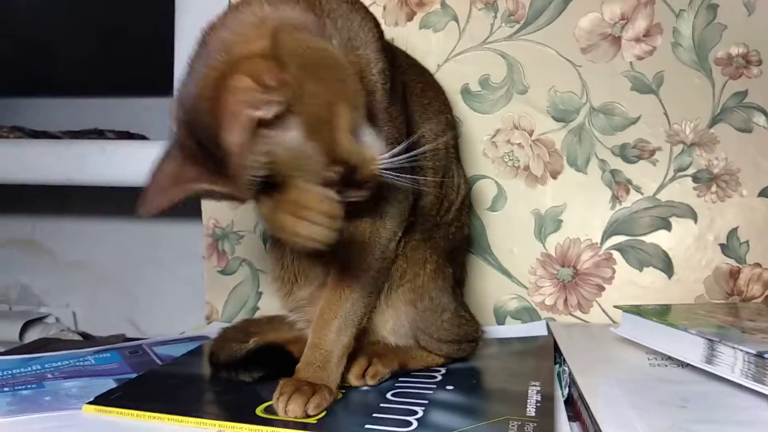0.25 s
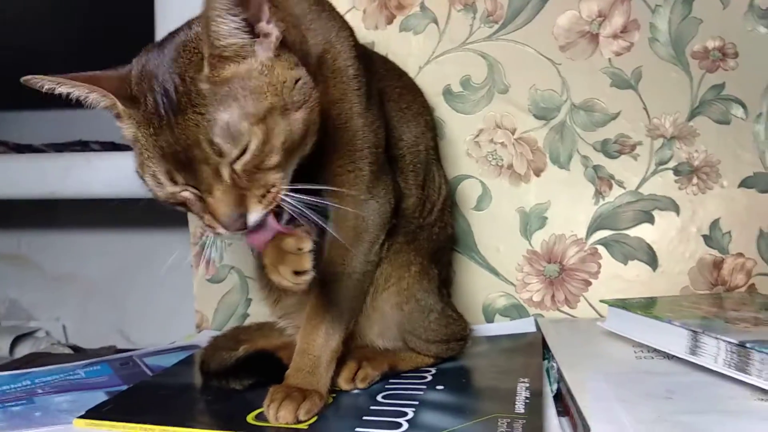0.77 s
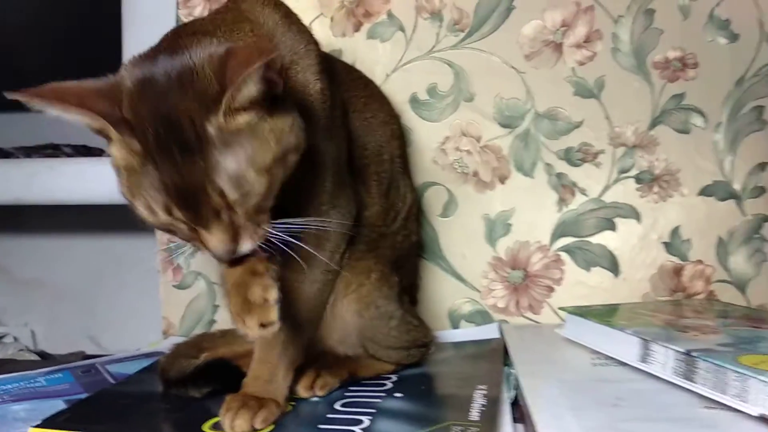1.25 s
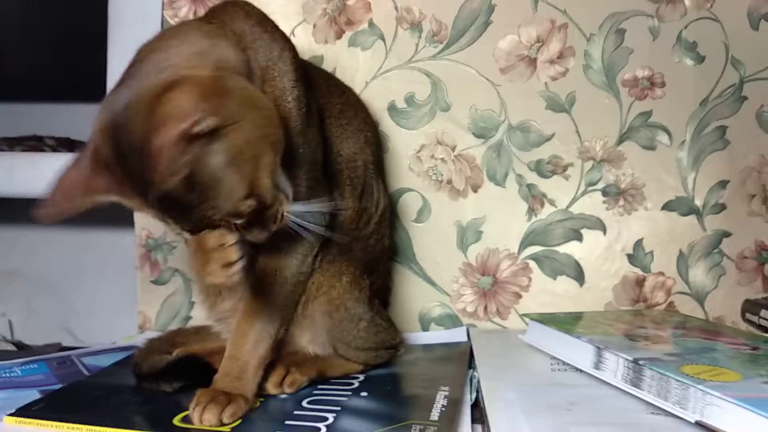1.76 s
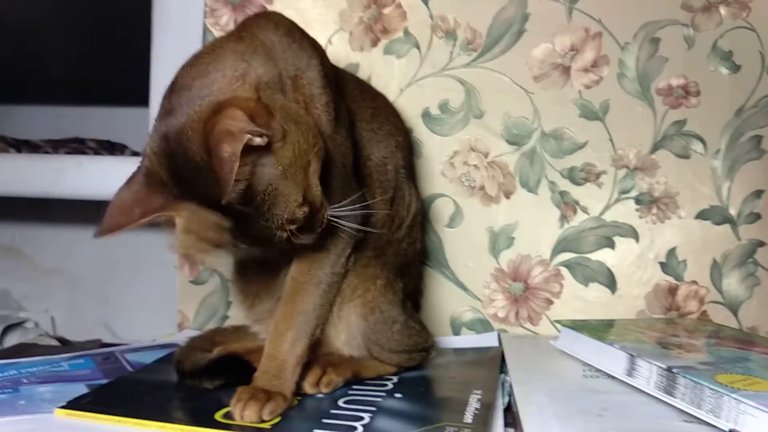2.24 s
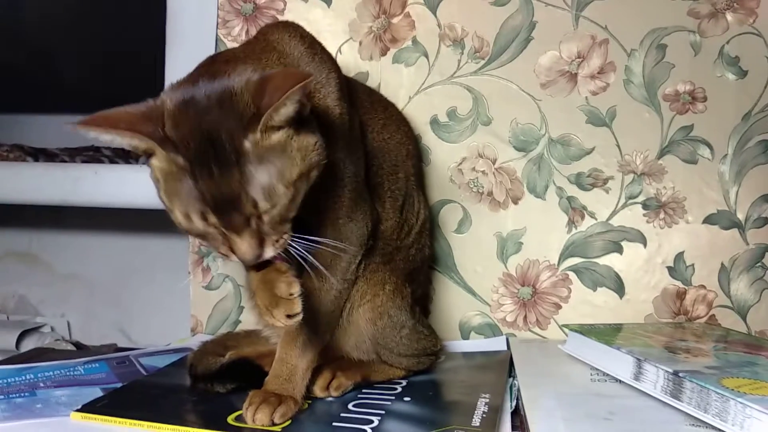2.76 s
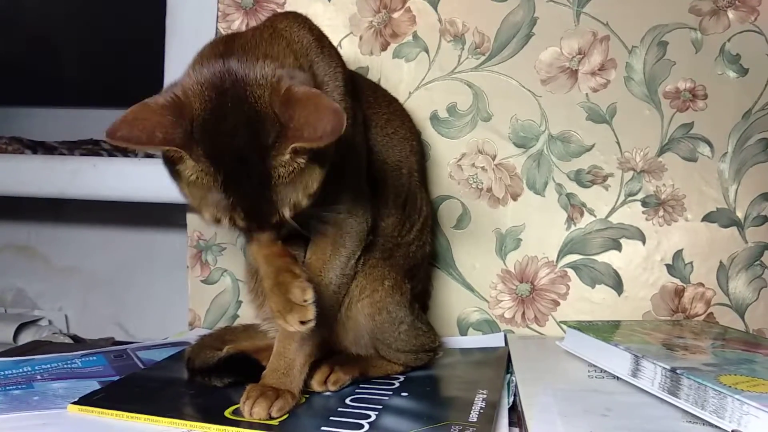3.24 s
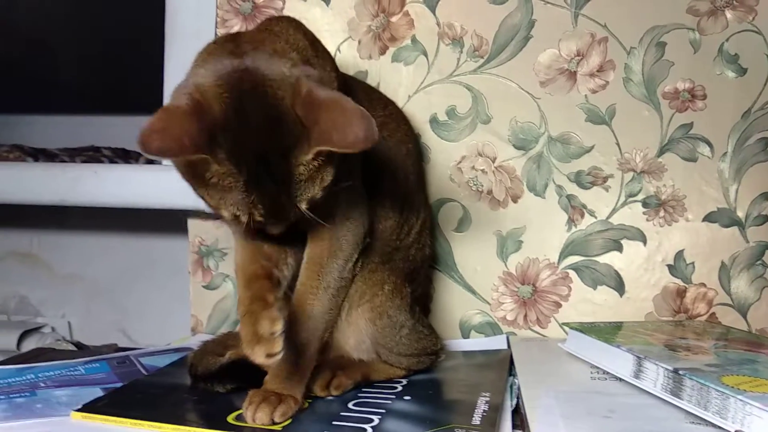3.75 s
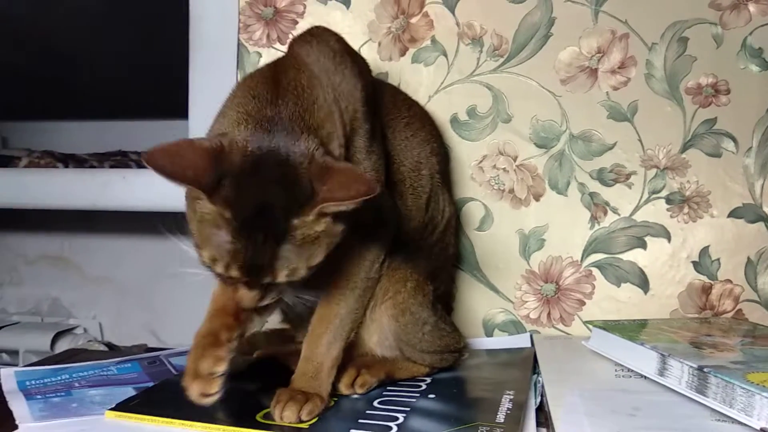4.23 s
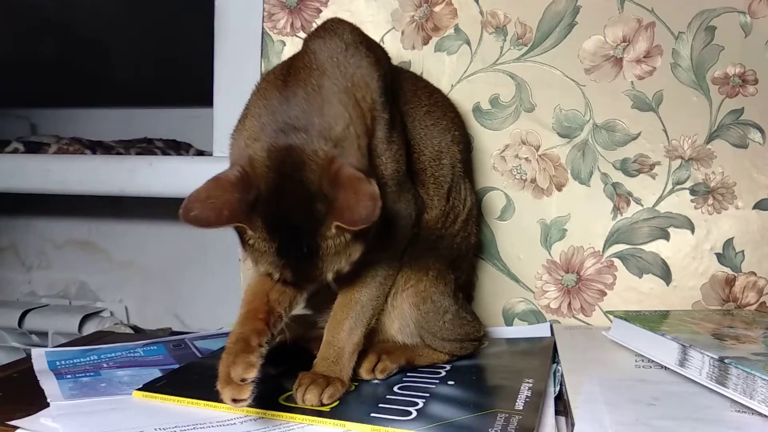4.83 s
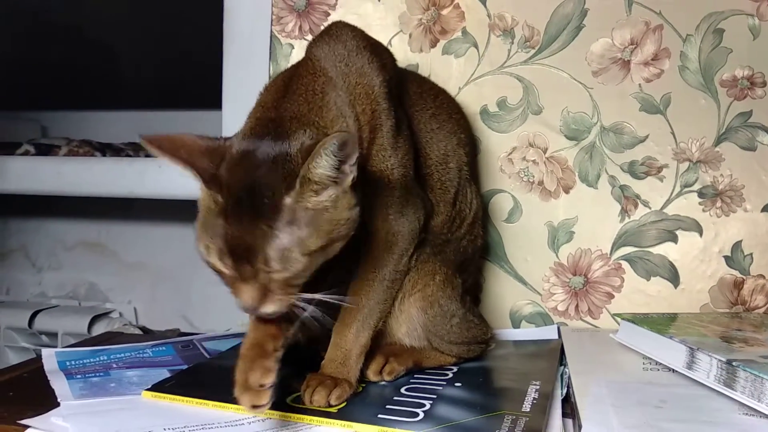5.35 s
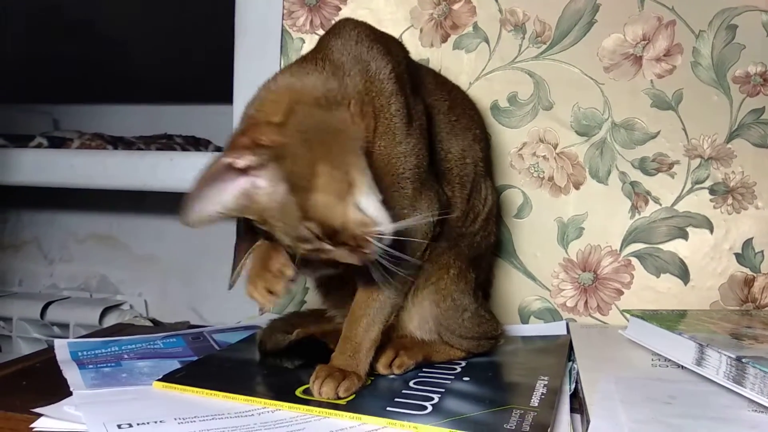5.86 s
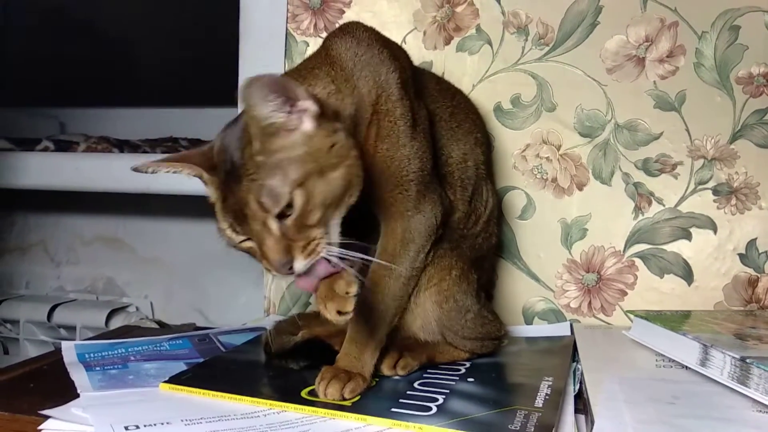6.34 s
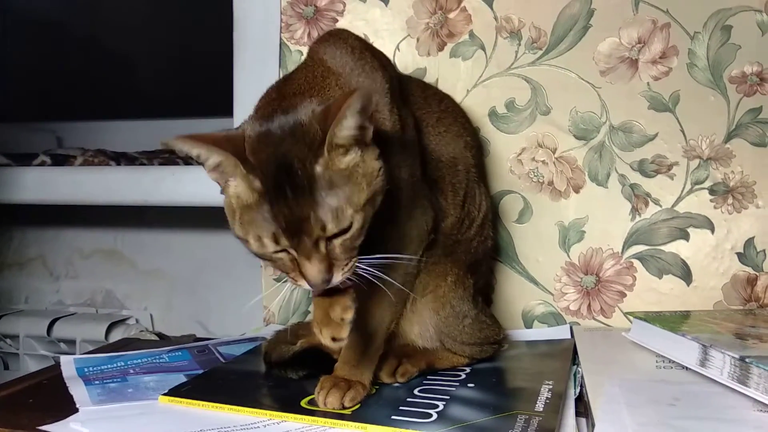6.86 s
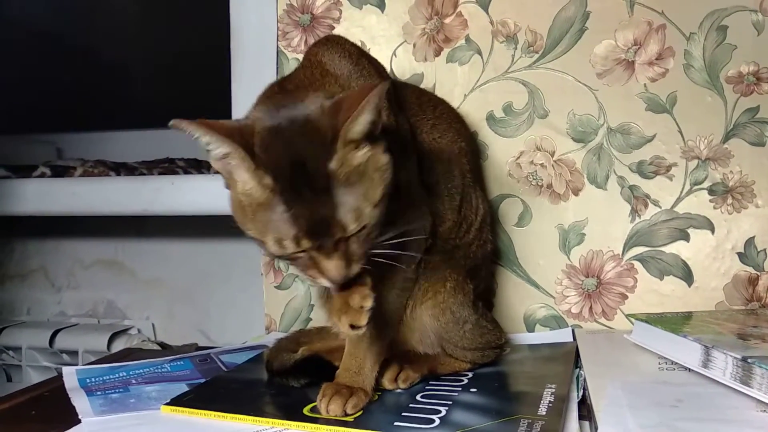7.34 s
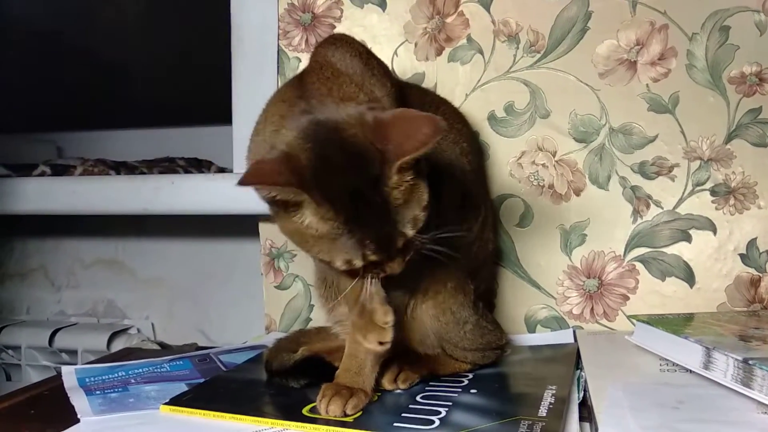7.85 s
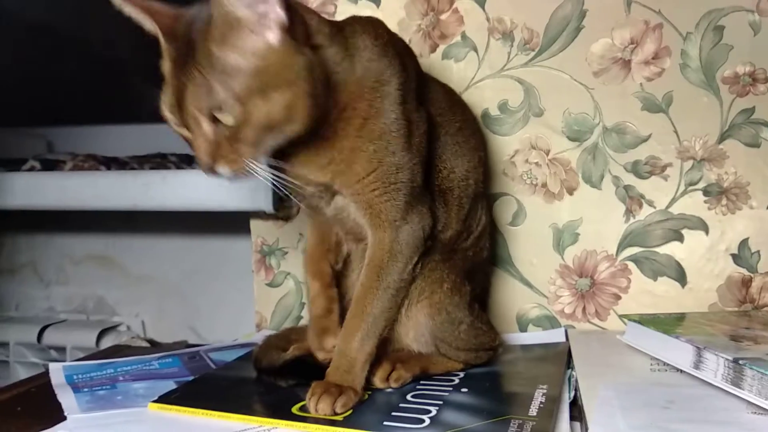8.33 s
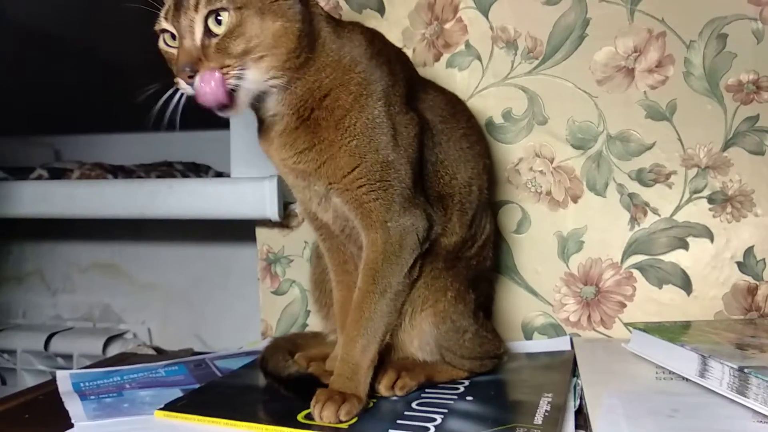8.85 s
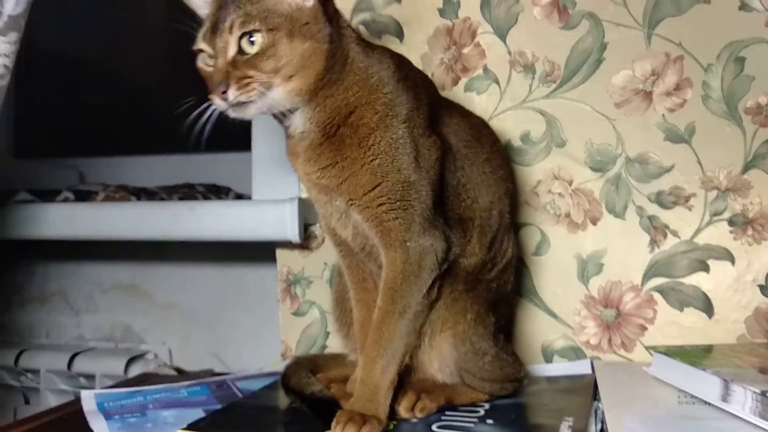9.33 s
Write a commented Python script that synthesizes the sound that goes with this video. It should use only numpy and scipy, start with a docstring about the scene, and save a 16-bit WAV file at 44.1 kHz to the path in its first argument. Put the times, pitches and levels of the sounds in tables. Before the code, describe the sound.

A cat grooms itself in a quiet room: faint raspy licks, small snuffles and wet ticks, with sharp plastic clicks close at the left microphone.

```python
"""A cat washes its paw and face in a quiet room, close to a hand-held camera: tongue and paw rasp as grainy noise.
It snuffles into its coat in chopped puffs of air, its wet tongue and lips tick, its paws bump on magazines.
Hard by the left microphone the case clicks as a double snap with ringing modes, is knocked, and is brushed
in bands of hiss. Behind lies the low drone of the house, as filtered noise whose level wavers.
The soft sounds of fur, snuffles and drone drop out briefly now and then."""
import sys
import numpy as np
from scipy import signal
from scipy.fft import rfft, irfft, next_fast_len
from scipy.io import wavfile
from scipy.ndimage import uniform_filter1d, map_coordinates

SR = 44100
rng = np.random.default_rng(int(sys.argv[2]) if len(sys.argv) > 2 else 0)


def digitize_waveform(pressure):
    """Quantize a signal to 16-bit integers and store it at the path in sys.argv[1].

    Rows of a 2-D input are taken as channels; values are limited to [-1, 1].
    """
    field = np.atleast_2d(pressure).T
    bounded = np.clip(field, -1, 1)
    quanta = np.round(bounded * 32767).astype(np.int16)
    wavfile.write(sys.argv[1], SR, quanta)


N = 422919

# strokes of tongue or paw over the fur: start t/s, length t/s, hiss level/dB before trim,
# dull rub level/dB relative to the hiss, before trim
STROKES = [(-.04, 0.085, -51.5, -7), (0.106, 0.44, -48, -4.5), (0.329, 0.15, -40.5, -2.5),
           (0.475, 0.13, -44.5, 0), (0.562, 0.17, -51.5, 0), (0.827, 0.14, -41, -6.5),
           (1.13, 0.15, -50, -3), (1.318, 0.067, -46.5, -6.5), (1.36, 0.52, -48.5, -7),
           (1.599, 0.099, -45, -4.5), (1.696, 0.11, -45, -12), (1.852, 0.073, -47, -9.5),
           (1.99, 0.14, -46, -7), (2.167, 0.085, -55, 3.5), (2.37, 0.21, -44, -21), (2.562, 0.26, -44, -9),
           (2.881, 0.12, -48, -7.5), (3.12, 0.25, -49.5, -1), (3.436, 0.13, -55, -3),
           (3.554, 0.14, -49, -4.5), (3.67, 0.18, -53, -6.5), (3.835, 0.069, -53, -1),
           (4.01, 0.49, -51.5, -27), (4.54, 0.11, -52, 0.5), (4.655, 0.14, -59.5, 1.5),
           (4.836, 0.3, -55, -1.5), (4.972, 0.067, -52.5, 1), (5.202, 0.11, -64, 11),
           (5.292, 0.22, -58.5, 3.5), (5.487, 0.066, -66.5, 21.5), (5.573, 0.062, -48.5, 0.5),
           (5.885, 0.083, -57, -3), (5.958, 0.092, -56, -9), (6.096, 0.12, -62, -6),
           (6.636, 0.078, -53.5, -10), (6.914, 0.089, -46, -10), (7.084, .07, -51, -26),
           (7.398, 0.16, -50.5, -24), (7.625, 0.19, -56.5, 2.5), (7.804, 0.21, -48, -8),
           (7.98, 0.28, -46.5, -10), (8.207, 0.12, -50.5, -5), (8.505, 0.25, -45, -7.5),
           (8.922, 0.53, -45, -2), (9.126, 0.52, -45, -2)]
# continuous rustle of the moving coat, rising and falling: t/s, hiss level/dB before trim
COAT_RUSTLE = [(0, -56.5), (.77, -62.5), (1, -48), (1.5, -51.5), (2.7, -48), (3.08, -57.5), (3.3, -54),
               (3.95, -62), (4.7, -60), (5.2, -62.5), (5.65, -58), (6.3, -70.5), (6.8, -59), (7, -50.5),
               (7.33, -54), (7.7, -47.5), (8.45, -49.5), (9.59, -48.5)]
# colour of the hairs' hiss: f/Hz, relative level/dB
HAIR_COLOUR = [(880, -20), (1500, -8), (2910, -5.5), (3060, -4), (4690, -1.5), (5070, -1), (8740, 1.5),
               (10800, -1), (15100, -11), (16000, -8.5)]
# colour of the dull rub on the skin: f/Hz, relative level/dB
RUB_COLOUR = [(150, -3.5), (260, -4), (400, 0), (600, -0.5), (950, 0.5), (1150, -2), (1600, 2), (2300, -4),
              (4000, -15)]
COAT_RUB_DB = -7  # rub of the rustling coat, relative to its hiss, before trim
HAIRS_DB, RUB_DB = 0.1, -2  # trims of the two layers
PEAK_SHARE, ROUNDNESS = 0.43, 0.47  # how far into a stroke it presses hardest; under 1 = a flat top
SLIPS_PER_S, SLIP_SHARE = 900, 0.11  # hairs that snap free of the barbs; their weight beside the noise
TUFTS_PER_S, TUFT_SHARE = 300, 0.43  # tufts that flick back and roughen the rub; their weight

# the cat's snuffles: t/s, level/dB, rise t/s, hold t/s, t60/s, centre f/Hz, width/octaves,
# hiss skirt level/dB before trim
SNUFFLES = [(0.516, -44, 0.011, 0.012, .12, 885, 0.14, -17), (0.892, -42, 0.013, 0.01, 0.15, 654, 1, -8),
            (1.593, -39.5, 0.0089, 0.015, 0.11, 596, 0.4, -28),
            (1.638, -49.5, .01, 0.016, 0.075, 1920, 0.44, -18),
            (1.737, -40, 0.0055, 0.017, 0.18, 830, 0.58, -27),
            (1.83, -48.5, .006, .01, 0.15, 1830, 0.46, -21),
            (2.685, -45, 0.012, 0.014, 0.35, 470, 0.1, -13),
            (3.253, -41.5, 0.003, 0.033, 0.24, 960, 0.45, -30),
            (3.27, -43, 0.0074, 0.01, .04, 930, 0.14, -28),
            (4.819, -39, 0.0072, 0.0083, 0.12, 1050, 0.51, -20.5),
            (4.857, -50.5, .008, 0.0094, 0.074, 900, .45, -21),
            (5.327, -46.5, 0.021, .012, 0.11, 780, 0.43, -22),
            (5.491, -32, 0.0082, 0.008, 0.18, 1065, 0.28, -26),
            (5.584, -46, 0.0029, 0.0066, 0.2, 1430, 0.41, -17),
            (6.387, -34.5, 0.012, 0.017, 0.17, 1190, 0.27, -18),
            (6.3967, -34, 0.00073, .003, 0.18, 2530, 0.17, -21),
            (6.443, -47, 0.013, 0.046, 0.18, 1380, .3, -2),
            (6.881, -59, .006, 0.0098, 0.055, 1600, 0.23, -24),
            (7.079, -57.5, 0.017, 0.046, .15, 2060, .17, -23)]
# colour of the nose: f/Hz, relative level/dB
NOSE_COLOUR = [(100, -14), (350, 4.5), (560, 2.5), (950, -5), (1500, 5.5), (2300, 1.5), (2900, 0.5),
               (3600, 3.5), (9000, -1.5), (16000, -15)]
SNUFFLE_SKIRT_DB = -1.5  # trim of the hiss in all snuffles
# the moist nostril flaps: middle rate, share of the air that they chop, unevenness
RASP_PER_S, RASP_SHARE, RASP_JITTER = 200, 0.45, 0.4
# resonances of the corner between wall, shelf and table: f/Hz, width/Hz, level/dB before scaling
CORNER = [(157, 12, 7.5), (176, 14, 6.5), (414.5, 27, 5), (577, 52, 6), (762, 22, 7), (968, 41, 8.5),
          (1150, 30, 6), (1314, 17, 8), (1435, 17, 3), (1577, 54, 3), (1936, 36, 4)]

# wet ticks of the tongue and lips, and at 6.3973 s the sharp onset of a snuffle:
# t/s, level/dB before trim, t60/s, pitch f/Hz, hiss level/dB beside the pitch
TICKS_AND_ONSET = [(0.345, -27.5, 0.054, 6460, -6), (.407, -32, .012, 6500, -3),
                   (0.612, -36.5, 0.16, 4200, -1), (0.684, -45, 0.14, 5200, 12),
                   (1.3223, -35.5, 0.049, 5200, 11), (2.032, -36, .012, 4240, -10),
                   (2.054, -35, 0.011, 4200, -8), (2.076, -34, 0.01, 4200, -14),
                   (2.253, -42, 0.0051, 5200, -6), (5.499, -44, 0.043, 3520, -14),
                   (5.588, -36.5, 0.06, 4800, -6), (5.779, -49, 0.11, 5200, 5), (5.908, -46, .03, 5200, -5),
                   (6.114, -51, 0.018, 4000, -18), (6.29, -51.5, .02, 5200, -12),
                   (6.347, -61, 0.018, 5200, -1), (6.3973, -23, 0.041, 1380, -38),
                   (6.491, -37.5, 0.028, 1490, -18), (6.747, -46, .02, 5200, 4),
                   (9.0428, -30, .012, 4930, -26)]
# colour of the wet mouth, shared by the onset: f/Hz, relative level/dB
WET_COLOUR = [(200, 2), (600, 2.5), (2000, -2), (4500, -1.5), (9000, 3.5), (16000, -7)]
# soft bumps of the paws on the magazines, and at 1.9888 s the short dull body of a case click:
# t/s, level/dB before trim, f/Hz, t60/s
BUMPS_AND_CLICK_BODY = [(0.159, -54.5, 80, 0.16), (1.35, -54, 86.5, 0.43), (1.451, -47.5, 221, 0.093),
                        (1.622, -44.5, 217, 0.17), (1.729, -51.5, 198, 0.23), (1.77, -50.5, 90, 0.26),
                        (1.9888, -31, 640, 0.0065), (2.819, -57, 95, 0.45), (5.502, -46, 91, 0.18),
                        (7.521, -49.5, 218, 0.074), (8.059, -51, 240, 0.12), (8.251, -50.5, 99, 0.18),
                        (9.281, -53, 219, 0.39), (9.368, -48.5, 197, 0.11)]

# wipes of a finger on the case (much weaker at the right) or of the paw on the cheek:
# t/s, length t/s, left level/dB, centre f/Hz, width/octaves, right minus left level/dB
BRUSHES = [(2.019, 0.077, -38.5, 4500, 0.62, -13), (2.069, 0.13, -41.5, 4600, 0.69, -18),
           (2.155, 0.12, -35.5, 4560, 0.54, -30), (2.255, 0.071, -43, 4620, 0.52, -24),
           (.86, 0.12, -49.5, 2916, 0.51, 1.5), (5.58, 0.08, -55, 4900, 0.27, -5)]
FLICKS_PER_S, FLICK_SIZE = 900, 3  # tiny catches in a wipe; their size over its hiss

# clicks of the case: t/s, overall level/dB, ringing level/dB before trim, brightness/dB per octave,
# gap to the second snap t/s, share of the case's colour (0-1), scrape level/dB within the snap
CLICKS = [(1.9882, -15.5, -13, -0.5, 0.00076, 0.43, -6.5), (2.7958, -11.5, -3.5, -1, .00105, 0.9, -11),
          (4.2684, -12, -4.5, -.5, .00105, 1, -13), (4.312, -17, -7, 4.5, .00082, 0.82, -11),
          (4.318, -25, 3, 2, .0009, 0.6, -14), (4.332, -32.5, 7.5, -6, .0009, .7, -15),
          (6.9344, -7.5, -4, -1.5, .00105, 1, -16), (6.949, -14, -3, 3, .00108, 0.64, -10),
          (6.9594, -19, -1, 3, .0008, 1, -13.5), (9.092, -8.5, -3.5, -1, 0.000853, 0.94, -13.5),
          (9.281, -18, 0, -2.5, .00105, 1, -13), (9.2885, -24, -8, 7, 0.00071, 1, -8),
          (9.296, -15.5, -3, 5, .001, 1, -10.5)]
# colour of the case: f/Hz, relative level/dB
CASE_COLOUR = [(100, -47), (210, -24), (300, -4), (480, -21), (800, -20), (1040, -7.5), (1500, -17),
               (2150, -21.5), (2900, 3.5), (3300, -4), (3850, 2.5), (4700, -2.5), (6000, -9), (7300, 3.5),
               (8500, -7), (9700, -12), (11500, -13.5), (13500, -19.5), (16000, -33)]
# colour of the clicks at the right microphone: f/Hz, relative level/dB
FAR_COLOUR = [(100, -15), (320, -5), (520, -15), (900, -4), (1500, -2), (2500, -13), (3700, -2), (5500, -7),
              (7500, -3.5), (12000, -2.5), (16000, -15)]
# ringing modes of the case: f/Hz, relative level/dB, t60/s
CASE_MODES = [(304, -22.5, 0.14), (401, -33, 0.13), (1049, -23, 0.1), (1396, -26.5, 0.1),
              (1890, -24, 0.071), (2980, -16.5, 0.056), (3120, -31, .03), (4840, -27, 0.032),
              (7060, -20, 0.037), (7420, -21, 0.032), (8600, -30, 0.02)]
SECOND_SNAP_DB = -2.5  # second snap's impulse; the first is 0.9 in amplitude
SCRAPE_S = 0.0025  # the plastic scrapes this long as it lets go
AFTER_SLIPS_PER_S, AFTER_SLIP_SIZE = 990, 2.7  # slips that crackle in a click's tail; gain each adds
RING_WANDER_HZ = 22  # rms pitch waver of the held shell's modes
# dull knocks on the case: t/s, left level/dB, f/Hz, t60/s
KNOCKS = [(1.9895, -26, 292, 0.031), (2.0338, -30.5, 292, 0.013), (4.3125, -43, 304, .05),
          (4.333, -41.5, 397, 0.061), (6.9359, -41, 320, 0.038)]
KNOCK_RIGHT_DB = -15  # right microphone, relative to the left

# level of the house's low drone: t/s, mean level/dB
DRONE_LEVEL = [(0, -63), (5.4, -62.5), (5.9, -65), (6.9, -61), (7.3, -63.5), (9.59, -64)]
# colour of the drone: f/Hz, relative level/dB
DRONE_COLOUR = [(20, -48), (38, -30), (55, -19), (78, 1.5), (100, -4.5), (130, -3.5), (180, 0), (230, -4),
                (310, -15), (600, -21), (2000, -26.5), (16000, -30.5)]
# spans in which the soft sounds drop out: from t/s, to t/s
DROPS = [(.781, .795), (.813, .829), (3.968, 4), (4.788, 4.803), (5.123, 5.144), (5.194, 5.212),
         (5.304, 5.318), (5.864, 5.891), (6.066, 6.113), (6.143, 6.161), (6.237, 6.289), (6.298, 6.347),
         (6.358, 6.389), (6.574, 6.612)]
DROP_DB_PER_S, DROP_DEEPEST_DB = -1150, -30  # a longer gap is a deeper one, down to the limit
# likeness of the two microphones: f/Hz, left-right correlation
ALIKE = [(60, 0.61), (300, 0.74), (600, 0.64), (900, 0.18), (1200, -0.13), (3000, 0.091), (8000, -0.075),
         (16000, -0.05)]
TOP_HZ = 16000  # band limit of the camera


def fur():
    """Hairs slip off the tongue's barbs as dense grains over a duller rub of the skin, all on the coat's rustle."""
    hiss_power = amp(np.interp(np.arange(N) / SR, *np.transpose(COAT_RUSTLE))) ** 2
    rub_power = hiss_power * amp(COAT_RUB_DB) ** 2
    for start, length, db, rub_db in STROKES:
        power = (amp(db) * pressure(start, length)) ** 2
        hiss_power = hiss_power + power
        rub_power = rub_power + power * amp(rub_db) ** 2

    hair_noise = unit(patchy(patchy_db=2, size=1024)) + SLIP_SHARE * grains(N, SLIPS_PER_S)
    hairs = stereo(hair_noise, lambda hz: along(HAIR_COLOUR, hz))
    rub_noise = unit(patchy(patchy_db=3, size=1024)) + TUFT_SHARE * grains(N, TUFTS_PER_S)
    rub = stereo(rub_noise, lambda hz: along(RUB_COLOUR, hz) + corner(hz))

    # each layer's level also flutters at random
    hairs_gain = amp(HAIRS_DB + 0.83 * wobble(70))
    rub_gain = amp(RUB_DB + 1.2 * wobble(50))
    return hairs * np.sqrt(hiss_power) * hairs_gain + rub * np.sqrt(rub_power) * rub_gain


def pressure(start, length):
    """A stroke presses in, peaks and lifts off."""
    peak = start + length * PEAK_SHARE
    phase = np.interp(np.arange(N) / SR, [start, peak, start + length], [0, np.pi / 2, 0])
    return np.sin(phase) ** ROUNDNESS


def grains(size, per_s):
    """Two unrelated rains of tiny impulses of uneven strength, rms 1."""
    falls = rng.random((2, size)) < per_s / SR
    return unit(rng.standard_normal((2, size)) * falls)


def patchy(patchy_db, size):
    """Two noises whose shared colour shifts in small random patches of time and frequency."""
    z = signal.stft(rng.standard_normal((2, N)), nperseg=size)[2]
    field = uniform_filter1d(rng.standard_normal(z.shape[1:]), size=3, axis=0)
    field = uniform_filter1d(field, size=4, axis=1)
    return signal.istft(z * amp(patchy_db * unit(field)), nperseg=size)[1][:, :N]


def snuffles():
    """Short puffs of air through the cat's nose: each bursts out, holds and fades with a moist rasp."""
    out, t = np.zeros((2, N)), np.arange(SR // 2) / SR
    for s, db, rise, hold, t60, centre, octaves, hiss_db in SNUFFLES:
        puff = np.minimum(t / rise, 1) * amp(-60 * np.maximum(t - rise - hold, 0) / t60)

        def colour(hz):
            resonance = hump(hz, centre, octaves, hiss_db + SNUFFLE_SKIRT_DB)
            return resonance + along(NOSE_COLOUR, hz) + 1.43 * corner(hz)

        air = rng.standard_normal((2, len(t))) * rasp(len(t))
        add(out, s, amp(db) * puff * stereo(air, colour))
    return out


def rasp(size):
    """Nostril flaps chop the air flow into uneven spurts, rms 1."""
    drift = unit(uniform_filter1d(rng.standard_normal(size), size=200))
    rate = RASP_PER_S * np.exp(RASP_JITTER * drift)
    phase = np.cumsum(rate) / SR % 1
    spurts = unit(np.exp(-4 * phase))
    return unit(1 - RASP_SHARE + RASP_SHARE * spurts)


def corner(hz):
    """The nook that the cat sits in adds narrow resonances, in dB."""
    return sum(db / (1 + (2 * (hz - centre) / width) ** 2) for centre, width, db in CORNER)


def ticks_and_onset():
    """Films of saliva break, and one snuffle sets in sharply: short spits of decaying noise about a pitch."""
    out, t = np.zeros((2, N)), np.arange(SR // 8) / SR
    for s, db, t60, centre, hiss_db in TICKS_AND_ONSET:
        colour = lambda hz: along(WET_COLOUR, hz) + hump(hz, centre, 0.22, hiss_db)
        spit = stereo(rng.standard_normal((2, len(t))), colour)
        add(out, s, amp(db - 3.5) * spit * amp(-60 * t / t60))
    return out


def bumps_and_click_body():
    """Padded paws push the magazines, and one click gets a dull body: bands of noise swell fast and die away."""
    out, t = np.zeros((2, N)), np.arange(SR // 2) / SR
    for s, db, centre, t60 in BUMPS_AND_CLICK_BODY:
        push = (1 - np.exp(-t / t60 * 18)) * amp(-60 * t / t60)
        thud = stereo(rng.standard_normal((2, len(t))), lambda hz: hump(hz, centre, 0.3, skirt_db=-57))
        add(out, s, amp(db - 3.0) * thud * push / push.max())
    return out


def brushes():
    """Each wipe swells and fades as a band of hiss, with tiny catches flicking through it."""
    out, t = np.zeros((2, N)), np.arange(SR // 2) / SR
    for s, length, db, centre, octaves, right_db in BRUSHES:
        swell = np.sin(np.pi * np.minimum(t / length, 1))
        catches = rng.random(len(t)) < FLICKS_PER_S / SR
        flicks = FLICK_SIZE * rng.standard_normal(len(t)) * catches

        def colour(hz):
            low_cut_db = 20 * np.log10(1 + (2600 / (hz + 1)) ** 6)
            return hump(hz, centre, octaves, skirt_db=-40) - low_cut_db

        hiss = stereo(rng.standard_normal((2, len(t))) + flicks, colour)
        add(out, s, amp([[db], [db + right_db]]) * swell * hiss)
    return out


def clicks():
    """Plastic lets go in a double snap by the left microphone; the shell rings and scatters it to the right."""
    out, t = np.zeros((2, N)), np.arange(SR // 8) / SR
    for s, db, ring_db, tilt_db, gap, colour_share, scrape_db in CLICKS:
        def colour(hz):
            tilt = tilt_db * np.log2(np.maximum(hz, 1500) / 5000)
            return colour_share * along(CASE_COLOUR, hz) + tilt

        shell = causal(colour)
        slips = 1 + AFTER_SLIP_SIZE * (rng.random(len(t)) < AFTER_SLIPS_PER_S / SR)
        # the tail builds up at once, then fades fast, then slowly
        decay = amp(-60 * t / 0.021) + amp(-9.0 - 60 * t / 0.08)
        scatter = unit(rng.standard_normal((2, len(t))) * slips) * decay * (1 - np.exp(-t / 0.00072))
        scrape = rng.standard_normal(len(t)) * np.sqrt(np.maximum(1 - t / SCRAPE_S, 0))

        force = 0.11 * amp(ring_db / 2) * scatter[0] + amp(scrape_db) * scrape
        force[0] += 0.9
        force[round(SR * gap)] -= amp(SECOND_SNAP_DB)  # the second snap pushes the other way
        snap = signal.fftconvolve(force, shell / np.abs(shell).max())[:len(t)]
        far = amp(-13.0 + ring_db / 2) * filtered(scatter[1], lambda hz: amp(along(FAR_COLOUR, hz)))
        rings = amp(ring_db - 5.0) * ringing(t) * amp([[0], [-17]])  # left, right
        add(out, s, amp(db) * (np.array([snap, far]) + rings))
    return out


def ringing(t):
    """The case's modes die away, each struck a little differently and wavering in pitch."""
    total = 0
    for hz, db, t60 in CASE_MODES:
        struck_db = db + rng.normal(0, 2.2)
        waver = RING_WANDER_HZ * unit(uniform_filter1d(rng.standard_normal(len(t)), size=100))
        phase = 2 * np.pi * np.cumsum(hz + waver) / SR
        total = total + amp(struck_db - 60 * t / t60) * np.sin(phase)
    return total


def knocks():
    """A soft blow rings a single low mode of the case, as a decaying sine."""
    out, t = np.zeros((2, N)), np.arange(SR // 8) / SR
    for s, db, hz, t60 in KNOCKS:
        tone = amp(db - 60 * t / t60) * np.sin(2 * np.pi * hz * t)
        add(out, s, tone * amp([[0], [KNOCK_RIGHT_DB]]))
    return out


def room_tone():
    """The low drone of the house: coloured noise whose level wavers at random."""
    db = np.interp(np.arange(N) / SR, *np.transpose(DRONE_LEVEL)) + 2.2 * wobble(7.7)
    return amp(db) * stereo(rng.standard_normal((2, N)), lambda hz: along(DRONE_COLOUR, hz))


def drop_out(x):
    """All but about a quarter of the bass sinks for a few hundredths of a second."""
    t = np.arange(N) / SR
    dip_db = np.zeros(N)
    for start, end in DROPS:
        depth_db = max(DROP_DB_PER_S * (end - start), DROP_DEEPEST_DB)
        dip_db += depth_db * ((t > start) & (t < end))
    bass = filtered(x, lambda hz: 0.24 / (1 + (hz / 160) ** 6))
    return bass + (x - bass) * amp(uniform_filter1d(dip_db, size=100))


def amp(db):
    """Amplitude of a level in dB."""
    return 10 ** (np.asarray(db) / 20)


def unit(x):
    """Scale to rms 1."""
    return x / np.sqrt(np.mean(x ** 2) + 1e-20)


def along(points, hz):
    """Values between (f/Hz, value) points on a log frequency axis."""
    f, v = np.transpose(points)
    return np.interp(np.log(hz + 1), np.log(f + 1), v)


def wobble(rate):
    """A smooth random curve, rate knots a second."""
    knots = rng.standard_normal(int(N * rate / SR) + 4)
    return map_coordinates(knots, [np.arange(N) * rate / SR])


def filtered(x, response):
    """Filter x by a response of frequency."""
    n = x.shape[-1]
    m = next_fast_len(n + SR // 10)
    return irfft(rfft(x, m) * response(np.fft.rfftfreq(m, 1 / SR)), m)[..., :n]


def causal(colour, size=2048):
    """Minimum-phase impulse response of a colour in dB."""
    cepstrum = irfft(np.log(amp(colour(np.fft.rfftfreq(size, 1 / SR)))))
    cepstrum[1:size // 2] *= 2
    cepstrum[size // 2 + 1:] = 0
    return irfft(np.exp(rfft(cepstrum)))


def stereo(pair, colour):
    """Two signals become coloured left and right of joint rms 1, most alike in the bass."""
    turn = lambda hz: np.arccos(np.clip(along(ALIKE, hz), -1, 1)) / 2
    response = lambda hz: amp(colour(hz)) * [np.cos(turn(hz)), np.sin(turn(hz))]
    mid, side = filtered(pair, response)
    return unit(np.array([mid + side, mid - side]))


def hump(hz, centre, octaves, skirt_db):
    """A broad resonance in dB, standing on a flat skirt."""
    bell = np.exp(-(np.log2((hz + 1) / centre) / octaves / 2) ** 2)
    return 20 * np.log10(bell + amp(skirt_db))


def add(track, s, sound):
    """Mix a sound in at time s, in seconds."""
    part = track[:, round(s * SR):][:, :sound.shape[-1]]
    part += sound[..., :part.shape[1]]


def scene():
    """Fur, snuffles and drone share the drop-outs; the ticks, bumps and case sounds lie on top."""
    soft = drop_out(fur() + room_tone() + snuffles())
    return soft + brushes() + bumps_and_click_body() + ticks_and_onset() + clicks() + knocks()


def record(dry):
    """The camera sheds the deepest bass and keeps nothing above its band limit."""
    low_cut = signal.butter(N=4, Wn=55, btype="highpass", fs=SR, output="sos")
    return filtered(signal.sosfilt(low_cut, dry), lambda hz: hz < TOP_HZ)


dry = scene()
out = record(dry)
digitize_waveform(out)
```